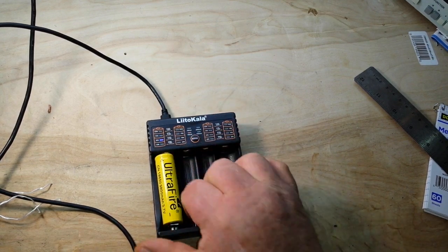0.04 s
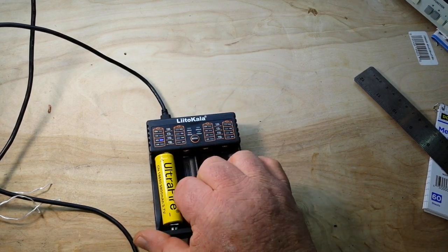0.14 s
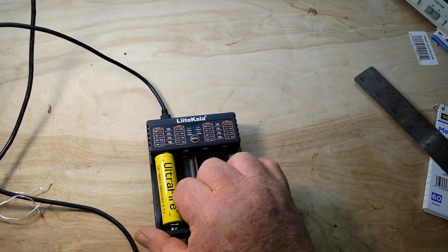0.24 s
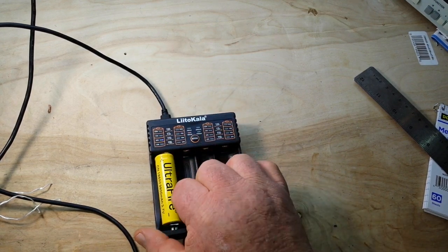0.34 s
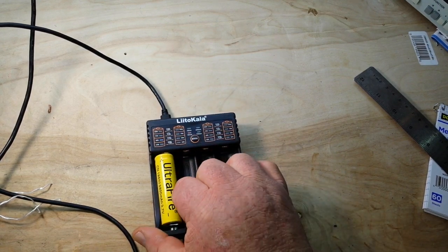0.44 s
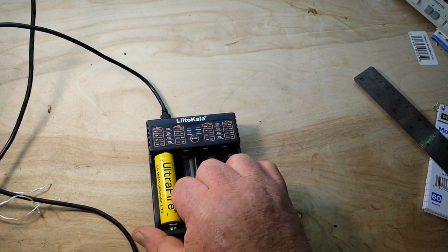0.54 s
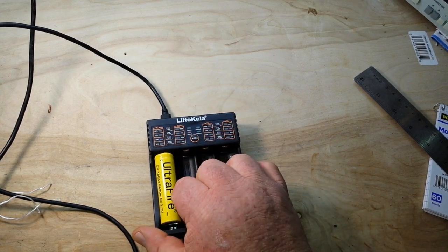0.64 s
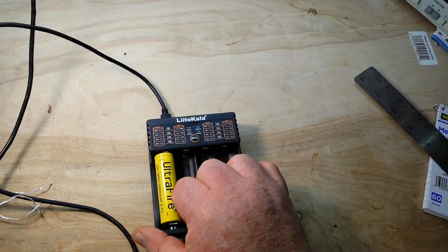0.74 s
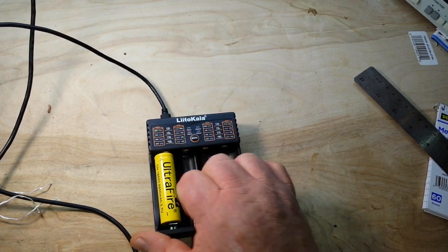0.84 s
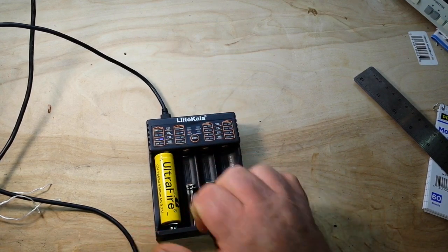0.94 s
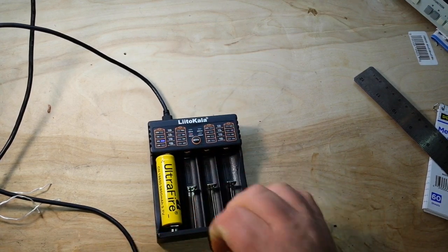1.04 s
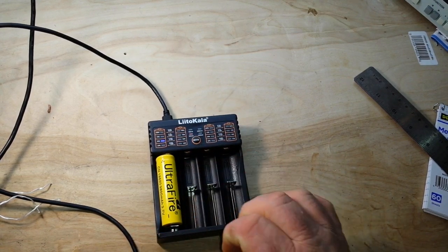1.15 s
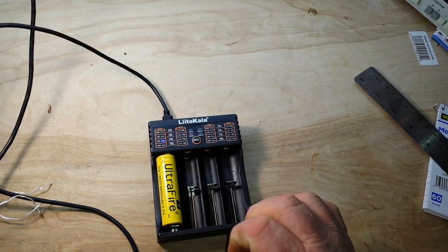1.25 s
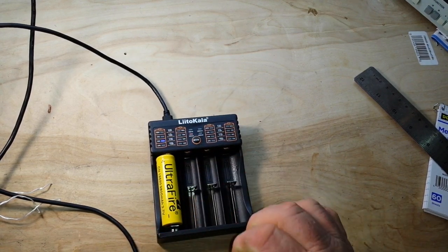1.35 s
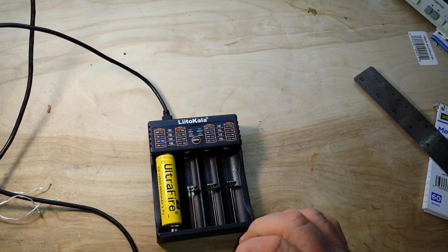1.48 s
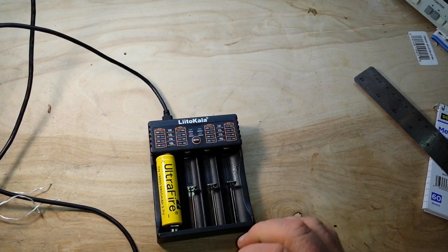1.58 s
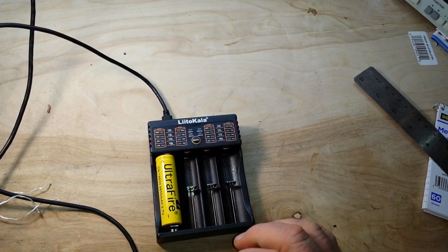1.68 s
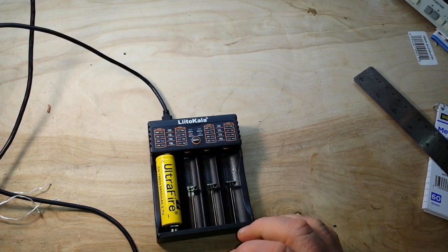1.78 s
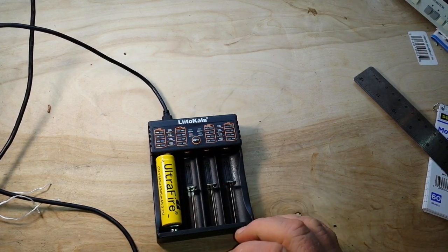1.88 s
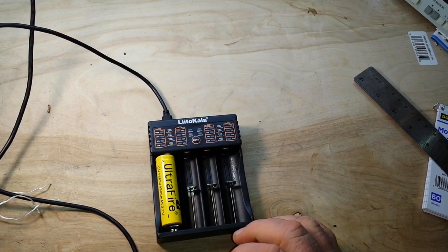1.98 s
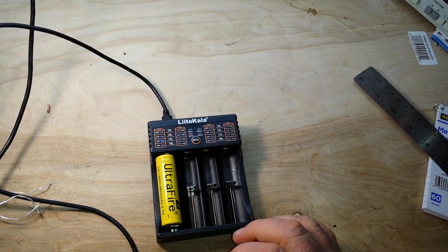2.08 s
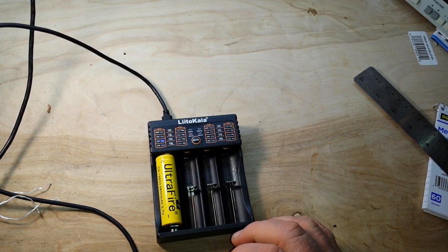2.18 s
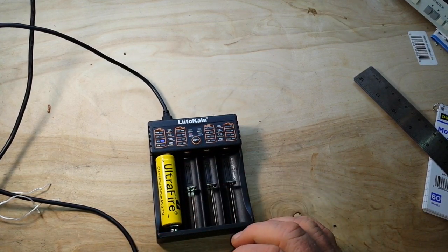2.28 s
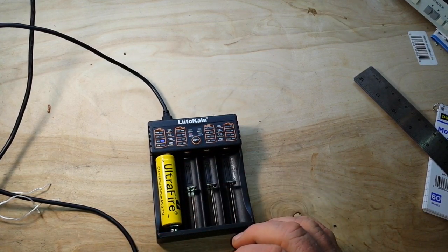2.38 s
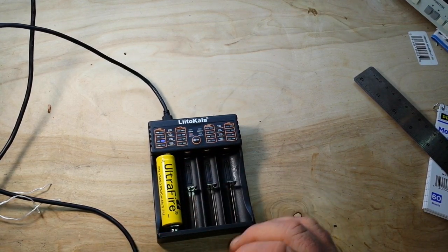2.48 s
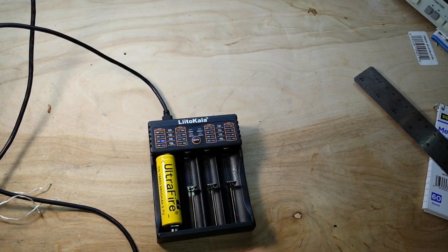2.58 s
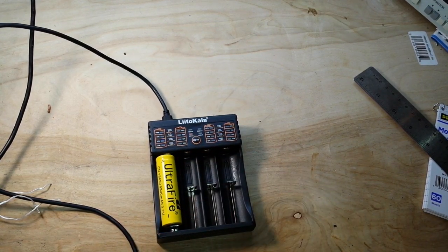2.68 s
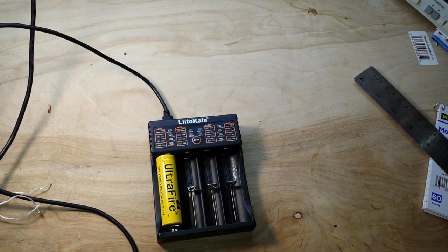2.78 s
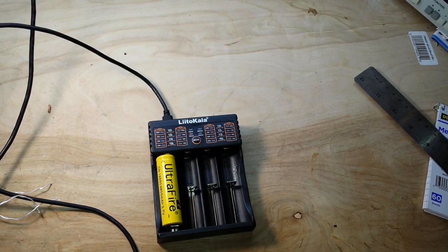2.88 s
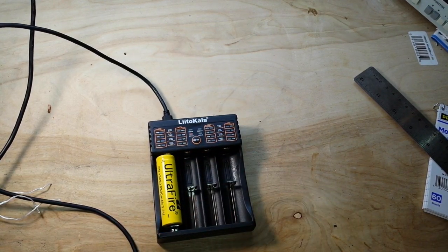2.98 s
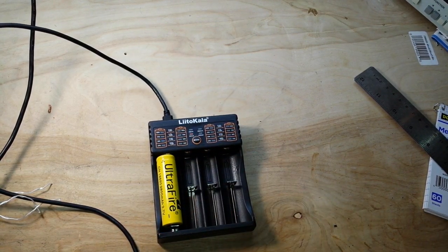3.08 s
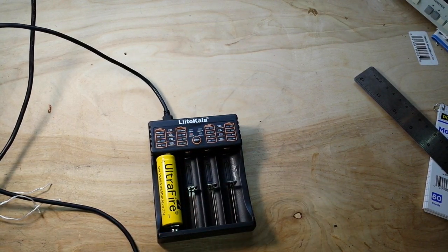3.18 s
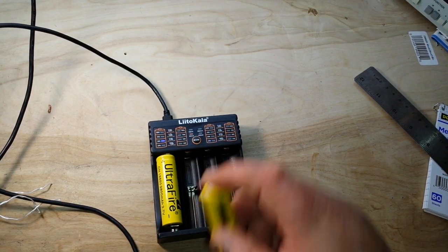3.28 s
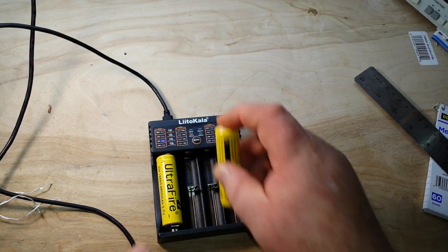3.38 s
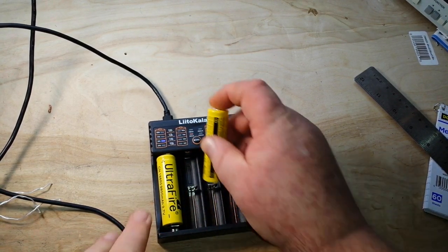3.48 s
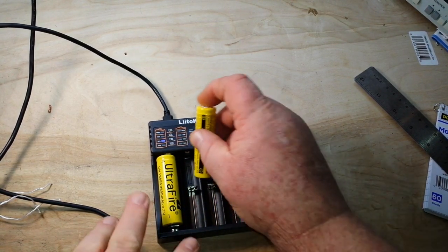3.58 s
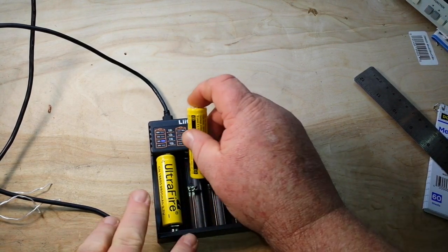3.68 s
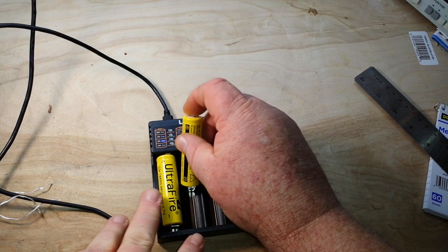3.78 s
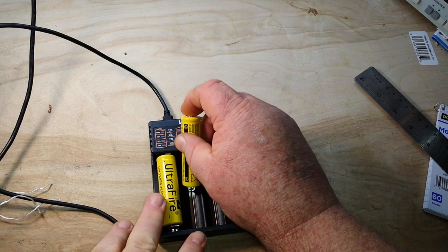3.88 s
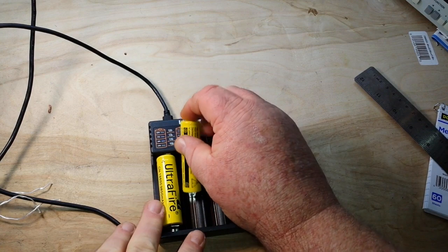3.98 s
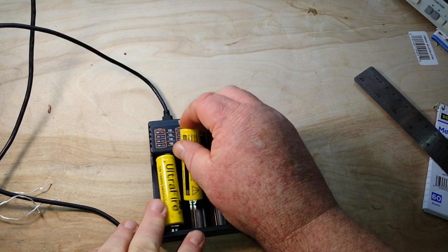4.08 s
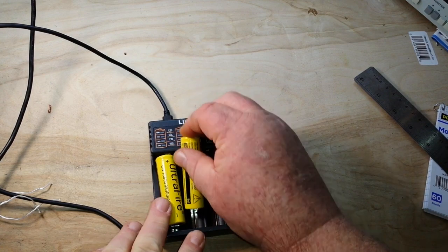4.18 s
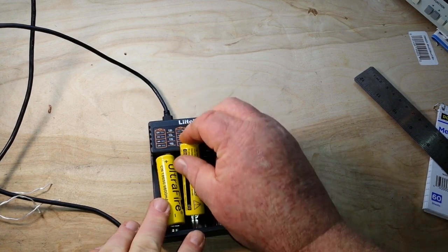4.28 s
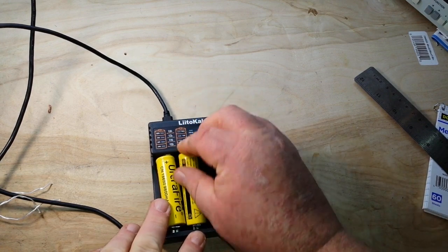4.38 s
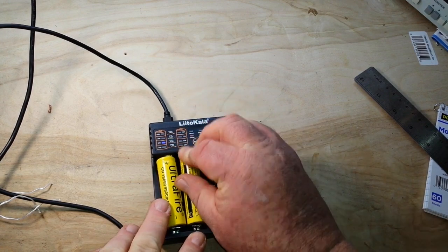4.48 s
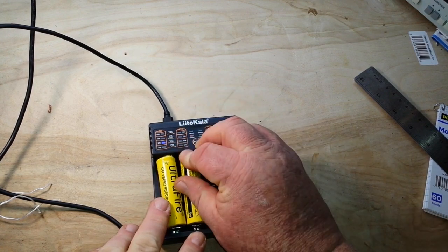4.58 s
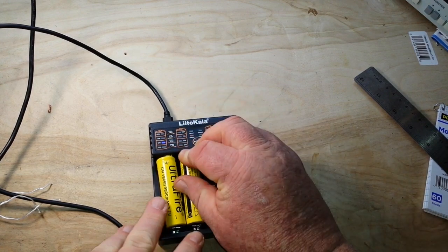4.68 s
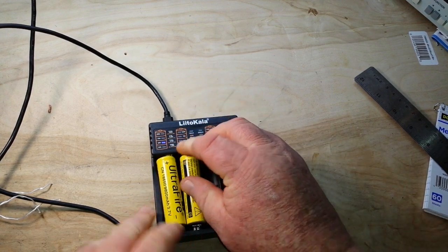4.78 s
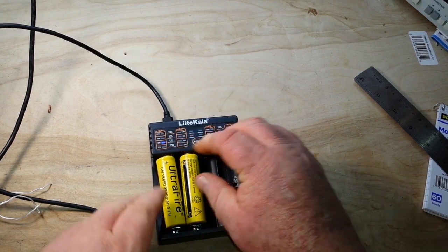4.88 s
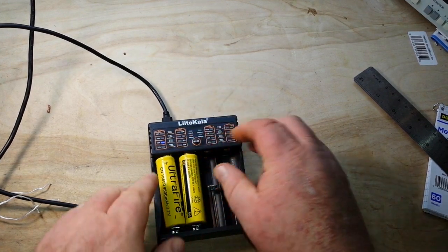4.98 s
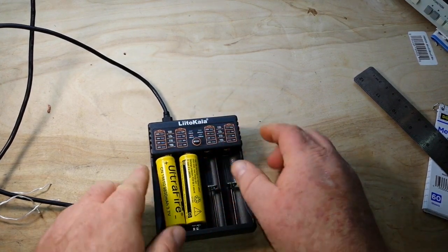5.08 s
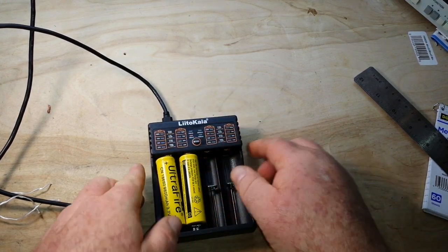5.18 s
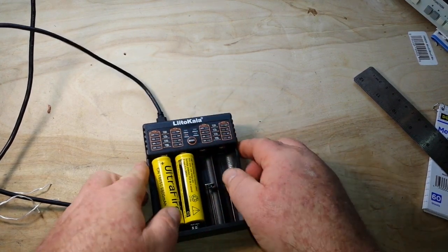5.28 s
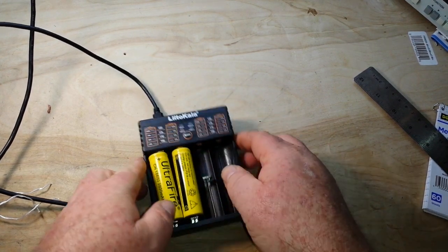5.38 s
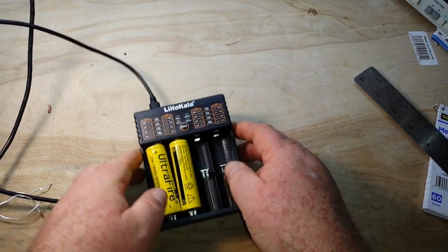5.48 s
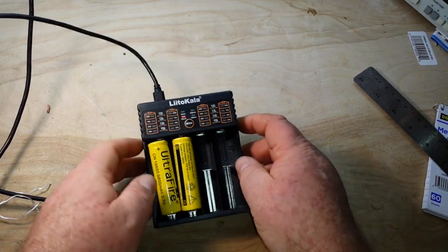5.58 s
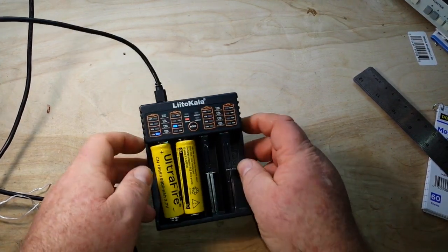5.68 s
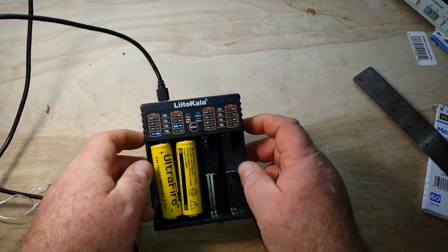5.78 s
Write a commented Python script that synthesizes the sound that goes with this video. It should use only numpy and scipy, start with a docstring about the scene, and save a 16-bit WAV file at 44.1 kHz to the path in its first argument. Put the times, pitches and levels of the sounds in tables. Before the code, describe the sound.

Over a faint mains hum, a hand brushes wood with light ticks, then a battery scrapes and clatters into a sprung plastic charger, ending in a hard snap.

```python
"""Mains hum and hiss in a small room, a hand brushing a wooden table, then light ticks and taps, a drone and a low moan.
A cell then goes into the sprung bay of a plastic charger: it knocks the case, drags the steel slider and snaps home.
Sines make the hum, shaped noise the hiss, brushing and rasp, narrow-band noise the drone and moan.
Short bursts and pushes into resonances make the ticks, taps, slips and knocks."""
import sys
import numpy as np
from scipy import signal
from scipy.fft import rfft, irfft, next_fast_len
from scipy.io import wavfile
from scipy.ndimage import uniform_filter1d, map_coordinates

SR = 44100
rng = np.random.default_rng(int(sys.argv[2]) if len(sys.argv) > 2 else 0)


def master_out(mix):
    """Clip the mix to full scale and print it as 16-bit PCM to the path in sys.argv[1]."""
    frames = np.transpose(np.atleast_2d(mix))
    ceiling = np.clip(frames, -1, 1)
    pcm = np.round(ceiling * 32767).astype(np.int16)
    wavfile.write(sys.argv[1], SR, pcm)


def gain_from_decibels(decibels):
    """Convert decibel values to linear amplitude factors."""
    exponent = np.asarray(decibels, float) / 20
    return 10 ** exponent


N = 257984

# background level, which dips after the clatter and then recovers: t/s, level/dB
BACKGROUND_LEVEL = [(0, -66.5), (.15, -65.5), (.4, -64), (4.7, -64), (4.85, -64), (5, -74), (5.3, -69),
                    (5.55, -67.5), (5.85, -62.5)]
# mains hum lines: f/Hz, level/dB over the background level
MAINS_LINES = [(60, 1), (120, -15), (180, -8.5), (240, -11.5), (300, -17), (360, -25.5), (600, -23.5),
               (840, -26)]
# colour of the room hiss: f/Hz, relative level/dB
AIR_COLOUR = [(18, -46), (30, -17.5), (48, -6), (133, -1.5), (164, -12.5), (243, -15.5), (379, -19.5),
              (575, -25.5), (639, -38.5), (830, -31), (897, -35), (970, -34.5), (4660, -34.5),
              (9000, -38.5), (14300, -36.5), (14800, -59)]
# narrow bands of a far motor, each filter applied twice: f/Hz, width/Hz, relative level/dB
DRONE_BANDS = [(90.6, 0.79, 0), (188.5, 11, -9.5), (289, 12, -13)]
# rise and fall of the drone: t/s, level/dB
DRONE_LEVEL = [(0, -87), (.3, -71), (.59, -75), (.73, -58.5), (2.5, -61), (3.1, -65), (3.74, -53.5),
               (4.84, -58.5), (5.03, -72.5), (5.85, -78)]
# bouts of the low moan: start t/s, length/s, level/dB
MOAN_BOUTS = [(0.293, 0.23, -68), (1.88, 0.24, -57), (2.453, .27, -64.5), (2.85, 0.2, -58.5),
              (3.092, 0.2, -57), (3.372, 0.15, -55.5), (5.602, 0.26, -61.5)]
# decay of the small room by 60 dB: f/Hz, time/s
ROOM_DECAY = [(100, 0.25), (500, 0.2), (2000, .19), (5000, 0.21), (7500, .19), (10000, 0.032)]

# skin and sleeve brushing the wood: start t/s, length/s, hiss level/dB, scuff level/dB, rub level/dB
HAND_STROKES = [(-.1, 0.25, -69, -82, -80.5), (0.184, 0.67, -66, -82, -72.5), (0.873, .25, -73.5, -92, -78),
                (1.134, 0.097, -64.5, -71, -71), (1.565, 0.65, -63, -66.5, -70.5),
                (2.124, 0.093, -68.5, -76, -80), (2.36, 0.21, -71.5, -73, -77),
                (2.585, 0.075, -61.5, -70.5, -72), (2.674, 0.18, -69.5, -78, -81),
                (3.055, 0.36, -71, -83, -78.5), (3.306, 0.47, -57, -69, -70.5),
                (3.671, 0.31, -54, -66, -66), (5.417, 0.047, -73, -82, -76), (5.297, .8, -69.5, -76.5, -76),
                (5.547, 0.075, -71, -76, -63), (5.62, .11, -69.5, -68.5, -58)]
# small ticks of nails and case: t/s, level/dB, f/Hz, width/Hz, fall by 20 dB/s
NAIL_TICKS = [(.515, -50, 4530, 1500, .002), (0.544, -52, 1980, 2000, 0.0018),
              (1.045, -41.5, 2420, 1500, .003), (1.1, -37.5, 3400, 2340, 0.0053),
              (1.156, -39, 1290, 1500, 0.0048), (1.785, -48.5, 820, 500, 0.0031),
              (1.932, -36.5, 1420, 2380, 0.0044), (2.0, -55, 550, 300, .004),
              (2.436, -47, 6200, 1500, .003), (2.474, -39, 4660, 1470, 0.0052),
              (3.569, -48, 800, 600, 0.007), (3.897, -34, 3500, 4000, .006), (4.069, -33, 796, 701, .004),
              (4.92, -57, 3693, 1498, 0.0098), (5.57, -54, 899, 593, 0.0048)]
# colour of the skin hiss: f/Hz, relative level/dB
HISS_COLOUR = [(2600, -38), (3300, -9.5), (3820, -5), (4150, -6), (4600, -1), (5000, -4.5), (5500, -4),
               (7000, -15), (8900, -26), (11000, -29.5), (13000, -77)]
# colour of the scuff: f/Hz, relative level/dB
SCUFF_COLOUR = [(1500, -23), (1950, -9), (2150, -3.0), (2450, -4.5), (2760, -2), (2950, -4.5),
                (3200, -5), (4000, -38)]
# colour of the dull rub: f/Hz, relative level/dB
RUB_COLOUR = [(250, -3), (450, -3.5), (900, -6.0), (1800, -9.5), (2600, -43.5)]

# drive of finger and case blows on the table:
# t/s, second mode level/dB, first mode level/dB, middle modes level/dB, upper modes level/dB
TABLE_BLOWS = [(0.202, -43.5, -65, -55, -63), (0.245, -43.5, -66, -50.5, -47), (0.289, -50, -71, -69, -76),
               (0.602, -41, -48, -51.5, -55), (0.622, -47, -54, -51, -50.5),
               (1.156, -27.5, -38, -47, -34.5), (1.217, -34.5, -61, -44.5, -45),
               (1.773, -42.5, -47, -61, -79), (1.995, -43.5, -70, -61, -55), (2.021, -40.5, -69, -69, -74),
               (3.938, -13.5, -28, -20.5, -20), (4.012, -35.5, -23, -35.5, -27.5),
               (4.038, -23, -32, -45, -49), (4.07, -20, -35.5, -32, -44), (4.109, -19, -44.5, -24, -14.5),
               (4.165, -28, -37.5, -38, -22), (4.204, -25.5, -35, -38.5, -27.5),
               (4.292, -21.5, -35, -37.5, -28.5), (4.444, -14, -23, -30.5, -34),
               (4.538, -18.5, -6.5, -19.5, -14), (4.577, -21, -24.5, -32, -37.5),
               (4.637, -11, -30, -22, -14.5), (4.861, -52, -59, -65.5, -81),
               (4.974, -51.5, -75, -62.5, -58), (5.27, -61, -59.5, -80, -77),
               (5.428, -72, -62.5, -65, -63.5), (5.566, -57, -72, -61, -56.5)]
# table top resonances: f/Hz, width/Hz, relative level/dB
TABLE_MODES = [(90, 22, 0), (124, 23, 0), (213, 30, -1), (250, 30, 0), (300, 40, -4), (380, 40, 0),
               (475, 50, -1), (600, 60, -3)]
# hollow shell resonances: f/Hz, width/Hz, relative level/dB
SHELL_MODES = [(750, 200, -7), (1000, 220, -9), (1190, 200, -7), (1400, 220, -2), (1590, 200, 0),
               (1760, 220, -2), (1980, 250, -7)]
# slider and case top resonances: f/Hz, width/Hz, relative level/dB
SLIDER_MODES = [(2240, 180, -6), (2620, 200, -8), (2940, 180, -4), (3400, 260, -7), (3700, 260, -4),
                (4020, 180, -1), (4570, 200, -1), (5100, 260, -2), (5430, 200, -2), (6060, 400, -7),
                (6550, 300, -10), (7160, 350, -13)]

# the cell feels for the slider, drags it, eases and lets go: t/s, rasp level/dB, table rumble level/dB
DRAG_LEVELS = [(3.62, -87, -78), (3.78, -63.5, -55.5), (3.925, -45, -36.5), (3.96, -60, -52),
               (4.08, -49.5, -38), (4.125, -30.5, -22.5), (4.179, -24, -27.5), (4.2, -30.5, -27.5),
               (4.317, -26.5, -25), (4.339, -25, -33), (4.445, -23.5, -23.5), (4.46, -34.5, -30),
               (4.515, -28.5, -29), (4.57, -30.5, -36.5), (4.625, -51.5, -41)]
# the slider sticks and slips: t/s, level/dB, f/Hz, fall by 20 dB/s
SLIDER_SLIPS = [(4.1657, -14, 3730, 0.015), (4.2204, -24.5, 4540, 0.014), (4.257, -25, 4000, 0.0059),
                (4.294, -16, 4003, 0.0094), (4.324, -15, 4080, 0.016), (4.352, -15.5, 4060, 0.018),
                (4.379, -21, 4590, 0.01), (4.4145, -9.5, 4500, 0.01), (4.4298, -13, 3646, 0.0099)]
# colour of the steel rasp: f/Hz, relative level/dB
RASP_COLOUR = [(600, -36), (1000, -9), (1900, -18), (2900, -4.5), (4100, -2), (5500, -5.5), (7200, -15),
               (9000, -21), (10300, -27.5), (11000, -60.5)]

# drive of the cell's knocks on the case:
# t/s, crack level/dB, shell level/dB, bright edge level/dB, rattle's fall by 20 dB/s
CASE_KNOCKS = [(3.934, -10.5, -25.5, -27.5, 0.011), (4.0099, -15, -11.5, -36, 0.013),
               (4.107, -21.5, -15, -58, 0.02), (4.5257, -17.5, -27.5, -40, 0.015),
               (4.5314, -10.5, -7.5, -36, 0.023), (4.5365, -23.5, -20.5, -43, 0.011),
               (4.5714, -18, -34.5, -46, 0.015), (4.6327, 2, -3, -22, 0.016)]
# colour of the crack: f/Hz, relative level/dB
CRACK_COLOUR = [(880, -25), (1500, -6.5), (2330, -16), (2580, -6), (3700, -5.5), (4060, -15), (4490, -2.5),
                (5120, -1.5), (9500, -43.5), (12400, -65.5), (20900, -120)]
# colour of the bright edge: f/Hz, relative level/dB
EDGE_COLOUR = [(5500, -24.5), (7200, 1.5), (9500, -8.5), (11000, -21.5), (14500, -22.5), (15600, -47.5)]


def unit(x):
    """Scaled to rms 1."""
    return x / np.sqrt(np.mean(x ** 2) + 1e-20)


def along(points, hz):
    """(Hz, value) points read on a log frequency axis."""
    f, value = np.transpose(points)
    return np.interp(np.log(hz + 1), np.log(f + 1), value)


def curves(rows, outside=None):
    """One value per sample for each column after the time."""
    s, *columns = np.transpose(rows)
    return [np.interp(np.arange(N) / SR, s, column, outside, outside) for column in columns]


def wobble(rate):
    """A smooth random curve, rate knots a second."""
    knots = rng.standard_normal(int(N * rate / SR) + 4)
    return map_coordinates(knots, [np.arange(N) * rate / SR])


def filtered(x, response):
    """x times a complex response of frequency."""
    m = next_fast_len(len(x) + SR // 2)
    return irfft(rfft(x, m) * response(np.fft.rfftfreq(m, 1 / SR)), m)[:len(x)]


def modes(rows):
    """Causal response of a body's resonances, with alternating polarity."""
    def response(f):
        return sum((-1) ** k * gain_from_decibels(db) * 1j * f * width / (centre ** 2 - f * f + 1j * f * width)
                   for k, (centre, width, db) in enumerate(rows))
    return response


def coloured(spectrum, grit_db=0):
    """Noise of rms 1; grit scatters the size of its grains."""
    grains = rng.standard_normal(N) * gain_from_decibels(grit_db * wobble(700))
    return unit(filtered(grains, lambda hz: gain_from_decibels(along(spectrum, hz))))


def resonant_noise(rows, grit_db, rate):
    """Noise of rms 1 rung through resonances, its drive wandering at rate knots a second."""
    return unit(filtered(rng.standard_normal(N) * gain_from_decibels(grit_db * wobble(rate)), modes(rows)))


def narrow_noise(rows):
    """Noise of rms 1 passed twice through narrow resonances."""
    return unit(filtered(rng.standard_normal(N), lambda f: modes(rows)(f) ** 2))


def dull_top(x, edge_hz):
    """A steep low-pass, 12 dB down at the edge."""
    return filtered(x, lambda f: (1 / (1 + np.sqrt(2) * 1j * f / edge_hz - (f / edge_hz) ** 2)) ** 4)


def swells(starts, lengths, dbs, attack, release):
    """Envelope of bouts that fade in, hold and fade out; attack and release are shares of the length."""
    u = (np.arange(N) / SR - starts[:, None]) / lengths[:, None]
    ramp = np.clip(np.minimum(u / attack, (1 - u) / release), 0, 1)
    return np.sqrt(gain_from_decibels(dbs) ** 2 @ np.sin(np.pi / 2 * ramp) ** 4)  # bouts add as powers


def bursts(times, dbs, lengths, rise):
    """Envelope of sudden contacts that lose 20 dB over their length; rise in seconds."""
    out, t = np.zeros(N + SR), np.arange(SR // 5) / SR
    for s, db, length in zip(times, dbs, lengths):
        fall = gain_from_decibels(db - 20 * t / max(length, 1e-3))
        out[round(s * SR):][:len(t)] += fall * (1 - np.exp(-t / rise))
    return out[:N]


def snaps(rows, rise):
    """Short noise bursts, each through its own resonance: rows (s, peak dB, Hz, width Hz, length s)."""
    out, t = np.zeros(N + SR), np.arange(SR // 15) / SR
    for s, db, hz, width_hz, length in rows:
        envelope = gain_from_decibels(-20 * t / max(length, 1e-4)) * (1 - np.exp(-t / rise))
        puff = rng.standard_normal(len(t)) * envelope
        snap = filtered(puff, lambda f: modes([(hz, width_hz, 0)])(f) ** 2)
        out[round(s * SR):][:len(t)] += gain_from_decibels(db) * snap / np.max(np.abs(snap))
    return out[:N]


def pushes(times, dbs, soft_s):
    """Soft one-sided pushes of unit area before their level."""
    u = np.arange(SR // 50) / SR / soft_s
    push = u * np.exp(-u)
    train = np.bincount(np.round(times * SR).astype(int), gain_from_decibels(dbs), N)[:N]
    return signal.fftconvolve(train, push / push.sum())[:N]


def ringing(excitation, rows, gain_db):
    """A body answers through its resonances; a unit blow peaks near gain_db."""
    blow = filtered(np.arange(SR // 4) == 0, modes(rows))
    return gain_from_decibels(gain_db) / np.max(np.abs(blow)) * filtered(excitation, modes(rows))


def patchy(x, depth_db):
    """Resonances shift as the contact moves: random gain in patches of frequency and time."""
    z = signal.stft(x, nperseg=256)[2]
    field = uniform_filter1d(rng.standard_normal(z.shape), size=5, axis=0)
    field = uniform_filter1d(field, size=6, axis=1)
    return unit(signal.istft(z * gain_from_decibels(depth_db * unit(field)), nperseg=256)[1][:N])


def background():
    """Mains sines and room hiss move together; a far motor's drone and a moan come and go as narrow noise."""
    drone_db, = curves(DRONE_LEVEL)
    background_db, = curves(BACKGROUND_LEVEL)
    t = np.arange(N) / SR
    hum = np.zeros(N)
    for hz, db in MAINS_LINES:
        line = np.sqrt(2) * np.sin(2 * np.pi * (hz * t + rng.random()))
        hum += gain_from_decibels(db + 0.87 * wobble(2.3)) * line
    hiss = gain_from_decibels(1.0) * coloured(AIR_COLOUR)
    drone = gain_from_decibels(drone_db) * narrow_noise(DRONE_BANDS)
    bouts = swells(*np.transpose(MOAN_BOUTS), attack=0.24, release=0.24)
    moan_level = np.hypot(bouts, gain_from_decibels(background_db - 14))  # a trace stays between bouts
    moan = moan_level * narrow_noise([(135, 9, 0)])
    return gain_from_decibels(background_db) * (hum + hiss) + drone + moan


def room(x):
    """Each frequency of the small room's answer, a noise tail, dies at its own speed."""
    hz, t, z = signal.stft(rng.standard_normal(SR // 2), SR, nperseg=256)
    decay = gain_from_decibels(-60 * t / along(ROOM_DECAY, hz)[:, None])
    tail = signal.istft(z * decay, SR, nperseg=256)[1]
    delayed = np.pad(x, (220, 0))  # 5 ms before the tail starts
    return signal.fftconvolve(delayed, tail / np.linalg.norm(tail))[:N]


def hands():
    """Nails tick; in each stroke skin hisses on the grain, scuffs in a lower band and rubs dully."""
    start, length, hiss_db, scuff_db, rub_db = np.transpose(HAND_STROKES)
    background_db, = curves(BACKGROUND_LEVEL)

    def level(stroke_db, rest_db):
        """Strokes over a faint rustle set relative to the background level."""
        strokes = swells(start, length, stroke_db, attack=0.29, release=0.3)
        return np.hypot(strokes, gain_from_decibels(background_db + rest_db))

    hiss = level(hiss_db, rest_db=-10) * gain_from_decibels(1.2 * wobble(30)) * coloured(HISS_COLOUR, grit_db=1.0)
    scuff = level(scuff_db, rest_db=-15.5) * gain_from_decibels(1.4 * wobble(23)) * coloured(SCUFF_COLOUR, grit_db=2.0)
    rub = level(rub_db, rest_db=-12.5) * gain_from_decibels(2.2 * wobble(23)) * coloured(RUB_COLOUR, grit_db=2.0)
    ticks = dull_top(snaps(NAIL_TICKS, rise=.0001), edge_hz=9000)
    return ticks + hiss + scuff + rub


def table():
    """Blows excite the top's modes by where they land: soft pushes the low ones, rough contact the overtones."""
    s, mid_db, deep_db, upper_db, top_db = np.transpose(TABLE_BLOWS)
    deep = ringing(pushes(s, deep_db, soft_s=0.00056), TABLE_MODES[:1], gain_db=5.5)
    mid = ringing(pushes(s, mid_db, soft_s=0.0011), TABLE_MODES[1:2], gain_db=7)
    upper = ringing(pushes(s, upper_db, soft_s=0.00017), TABLE_MODES[2:5], gain_db=5.5)
    lasting = np.full(len(s), .004)
    rough = bursts(s, top_db, lasting, rise=0.000081) * rng.standard_normal(N)
    hard = pushes(s, top_db, soft_s=.0001) + gain_from_decibels(-21) * rough
    # the overtones include the two lowest shell modes
    overtones = ringing(dull_top(hard, edge_hz=2500), TABLE_MODES[5:] + SHELL_MODES[:2], gain_db=2)
    return deep - mid - upper + overtones


def drag():
    """Steel grit on the rail rings slider and shell and shakes the table; each slip squeals near its own pitch."""
    rasp_db, rumble_db = curves(DRAG_LEVELS, -120)
    slider_noise = filtered(rng.standard_normal(N) * gain_from_decibels(2.6 * wobble(500)), modes(SLIDER_MODES))
    ring = unit(dull_top(slider_noise, edge_hz=9500))
    catches_db = 1.6 * wobble(45) + 3.2 * wobble(220)
    grit = coloured(RASP_COLOUR, grit_db=1.5)
    rasp = gain_from_decibels(rasp_db + catches_db) * patchy(grit + ring, depth_db=2.0)
    slip_width_hz = 1100
    slip_rows = [(s, db, hz, slip_width_hz, length) for s, db, hz, length in SLIDER_SLIPS]
    slips = snaps(slip_rows, rise=0.0092)
    # the shell follows the rasp, with milder catches
    hollow_level = gain_from_decibels(rasp_db - 13.5 + 0.67 * catches_db)
    hollow = hollow_level * resonant_noise(SHELL_MODES, grit_db=1.9, rate=150)
    # dragging favours the table modes below 170 Hz
    low_table = [(hz, width, db - 14 * (hz > 170)) for hz, width, db in TABLE_MODES]
    rumble = gain_from_decibels(rumble_db) * resonant_noise(low_table, grit_db=2.1, rate=40)
    return rasp + dull_top(slips + hollow, edge_hz=8500) + rumble


def knocks():
    """Each knock rattles the slider, rings the shell and spits a short bright edge."""
    s, crack_db, shell_db, edge_db, length = np.transpose(CASE_KNOCKS)
    rattle = bursts(s, crack_db, length, rise=0.00011)
    crack = gain_from_decibels(-4) * rattle * coloured(CRACK_COLOUR, grit_db=-4.0)
    slider = ringing(rattle * rng.standard_normal(N), SLIDER_MODES, gain_db=-19.5)
    thump = bursts(s, shell_db, .5 * length, rise=0.00052) * rng.standard_normal(N)
    shell = ringing(thump, SHELL_MODES, gain_db=-15)
    edge = bursts(s, edge_db, 0.38 * length, rise=0.00045) * coloured(EDGE_COLOUR, grit_db=1.5)
    return dull_top(crack + slider + shell, edge_hz=11400) + edge


def scene():
    """Near sources, their room and the background."""
    bed, hand, wood = background(), hands(), table()
    charger = drag() + knocks()
    reflections = room(gain_from_decibels(-12.5) * charger + gain_from_decibels(-13.0) * hand + gain_from_decibels(-10.0) * wood)
    return (charger + hand + wood + reflections + bed)[None]


def low_pass(x):
    """Removes everything above the highest recorded frequency."""
    return signal.sosfilt(signal.butter(12, 15830, fs=SR, output="sos"), x)


def record(dry):
    """The microphone drops the deepest bass, peaks are rounded off and the top treble is dulled."""
    ceiling, hardness = .93, 4  # full scale; exponent of the rounding
    heard = filtered(dry[0], lambda f: (1j * f / (42 + 1j * f)) ** 2)  # two 42 Hz high-passes
    rounded = heard / (1 + np.abs(heard / ceiling) ** hardness) ** (1 / hardness)
    finished = dull_top(rounded, edge_hz=18000)[None]
    return low_pass(finished)


dry = scene()
out = record(dry)
master_out(out)
```